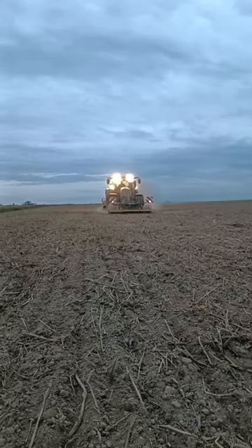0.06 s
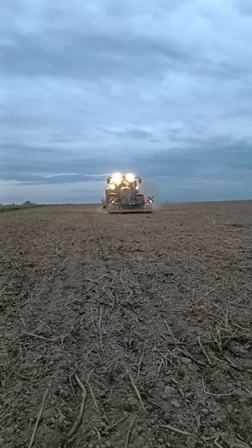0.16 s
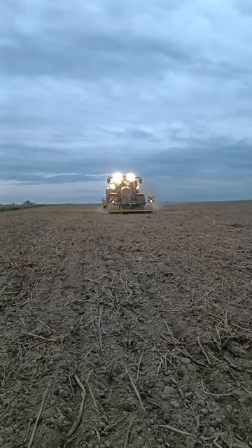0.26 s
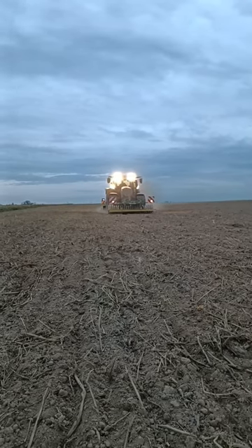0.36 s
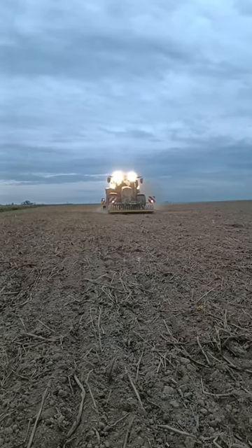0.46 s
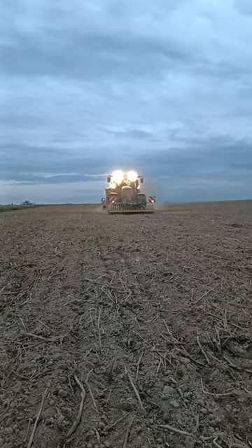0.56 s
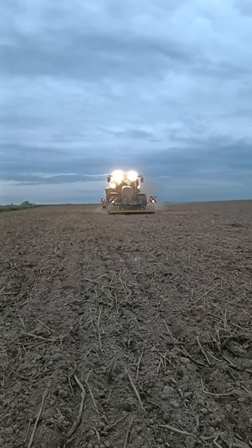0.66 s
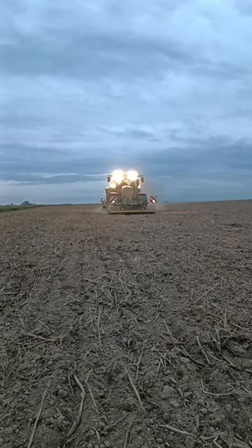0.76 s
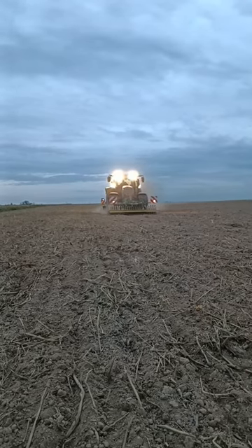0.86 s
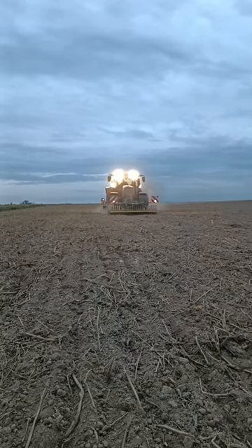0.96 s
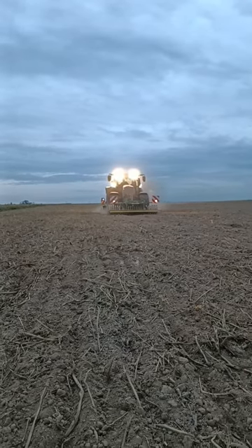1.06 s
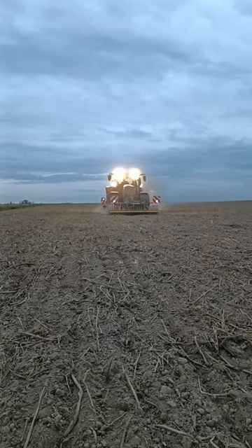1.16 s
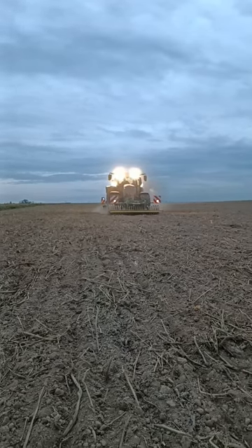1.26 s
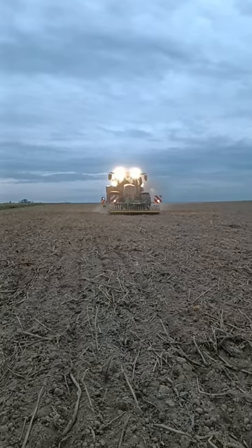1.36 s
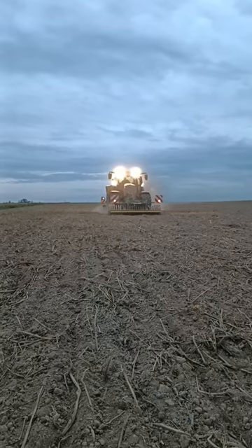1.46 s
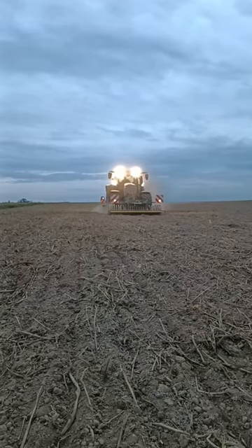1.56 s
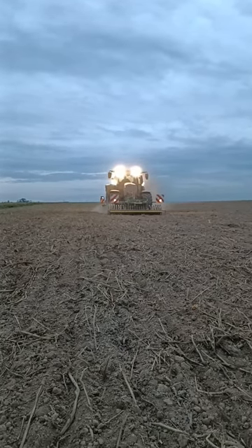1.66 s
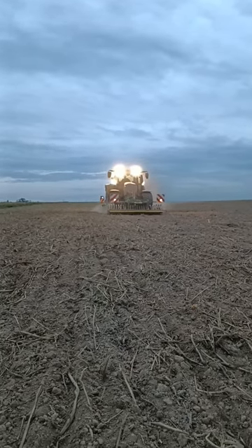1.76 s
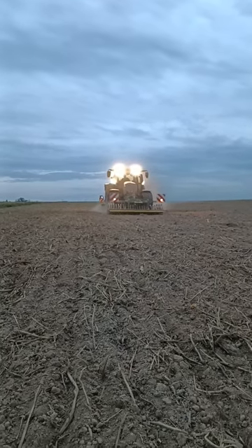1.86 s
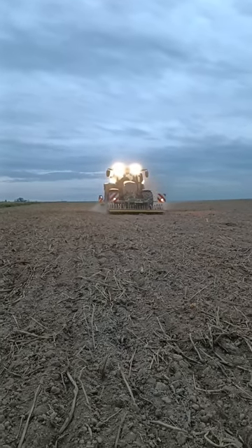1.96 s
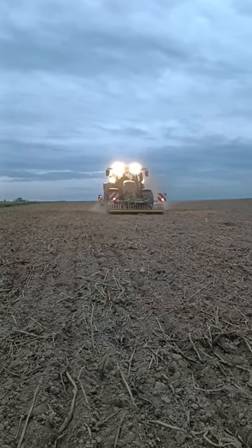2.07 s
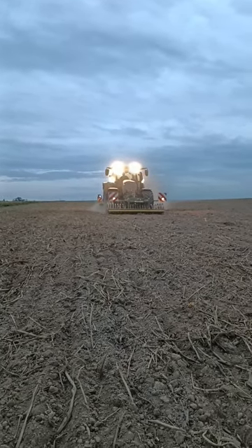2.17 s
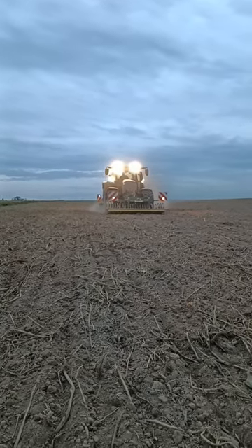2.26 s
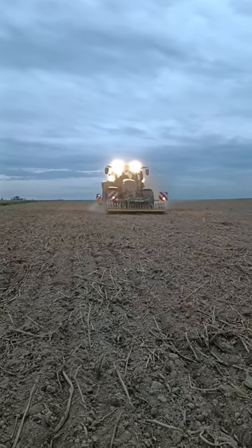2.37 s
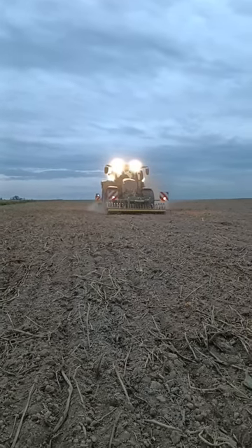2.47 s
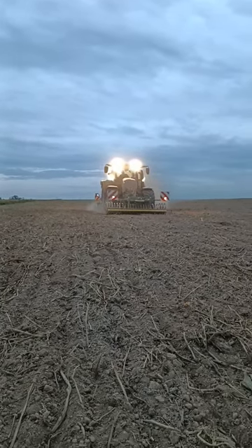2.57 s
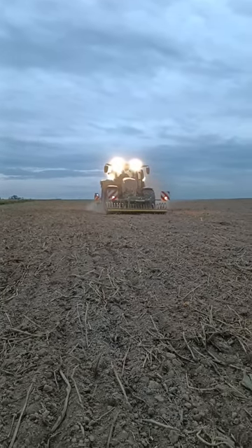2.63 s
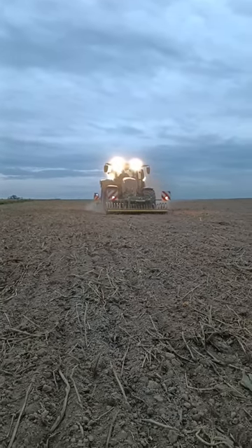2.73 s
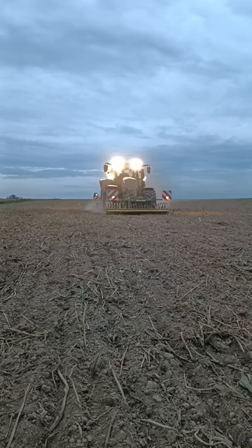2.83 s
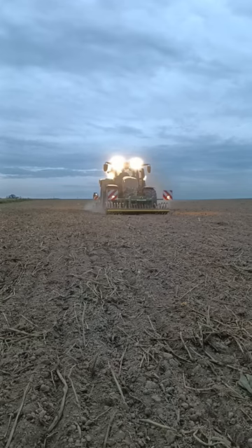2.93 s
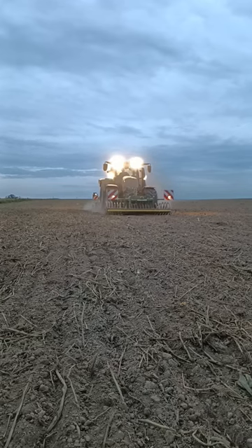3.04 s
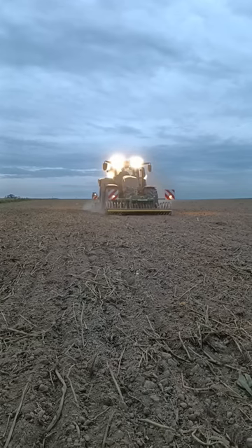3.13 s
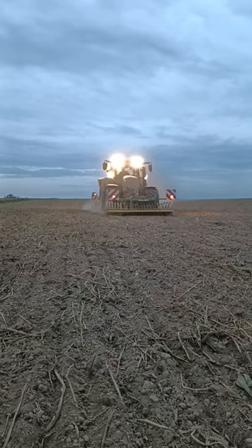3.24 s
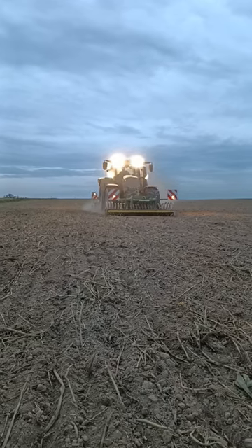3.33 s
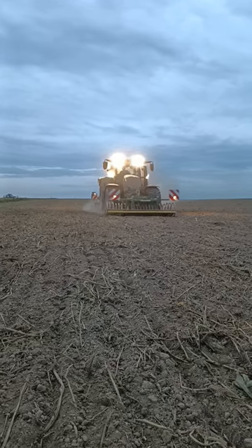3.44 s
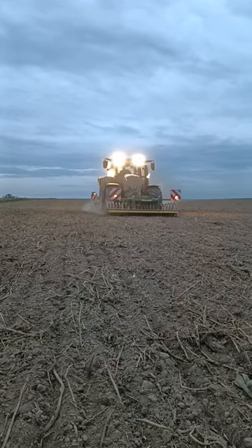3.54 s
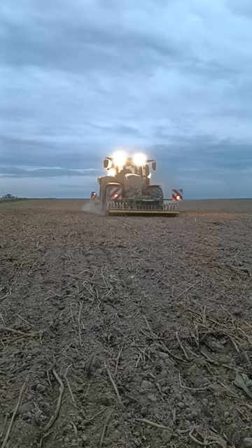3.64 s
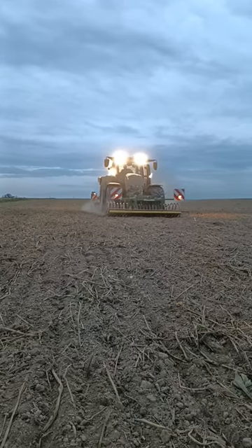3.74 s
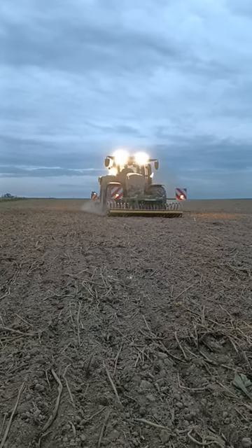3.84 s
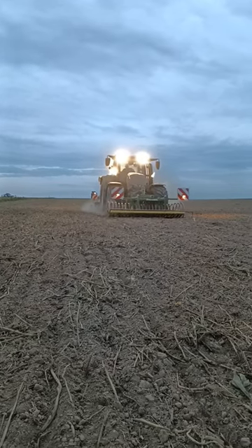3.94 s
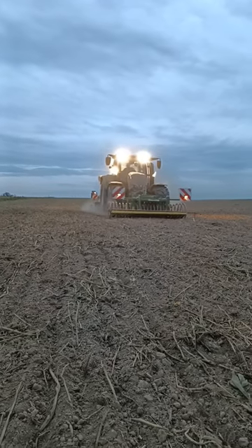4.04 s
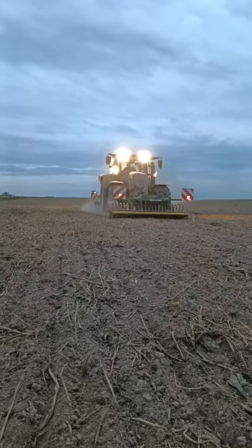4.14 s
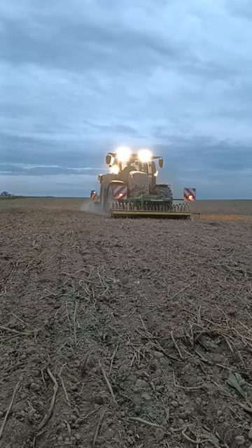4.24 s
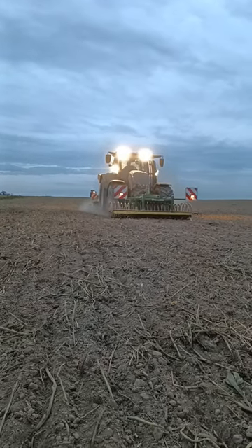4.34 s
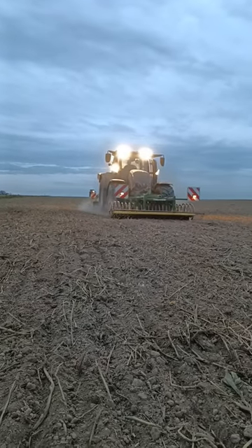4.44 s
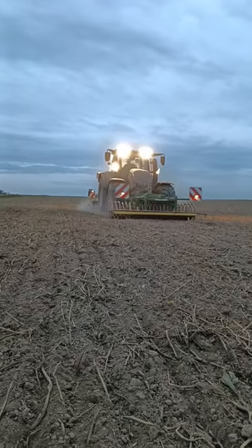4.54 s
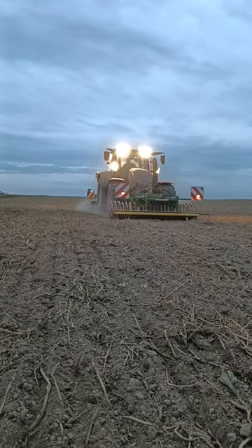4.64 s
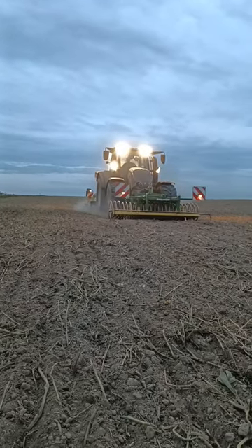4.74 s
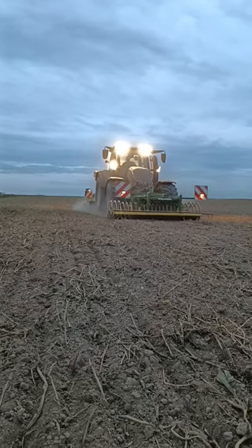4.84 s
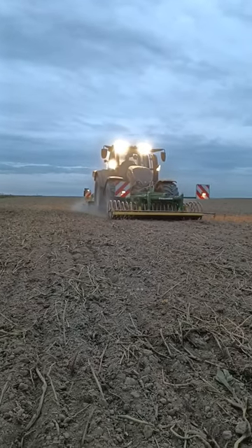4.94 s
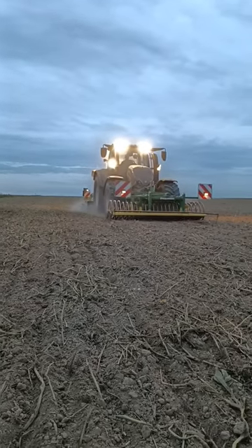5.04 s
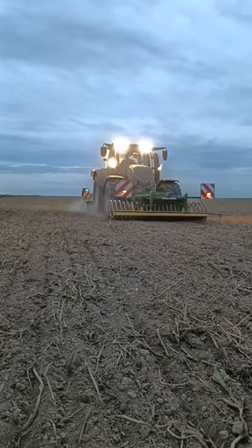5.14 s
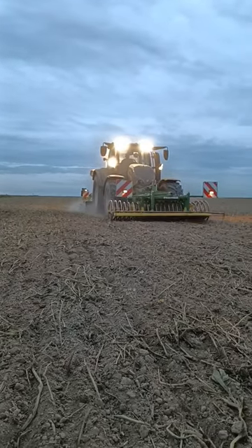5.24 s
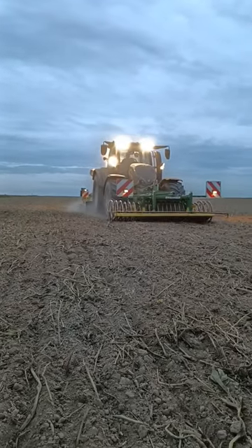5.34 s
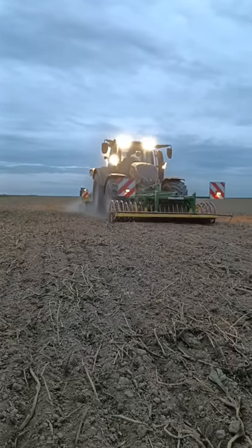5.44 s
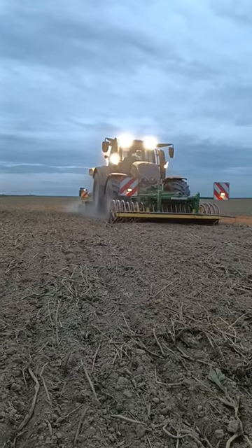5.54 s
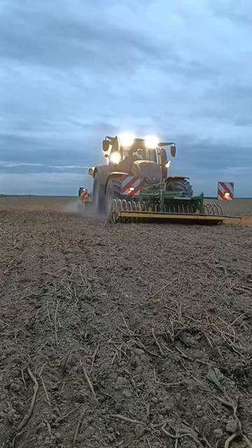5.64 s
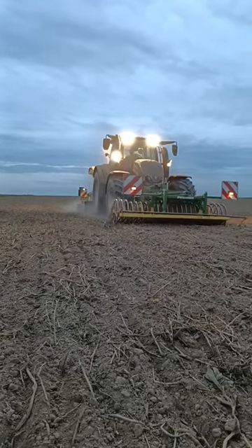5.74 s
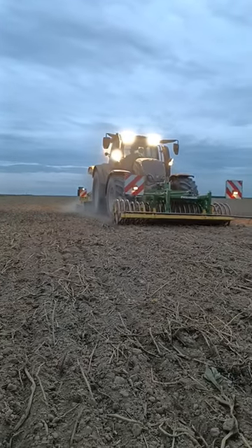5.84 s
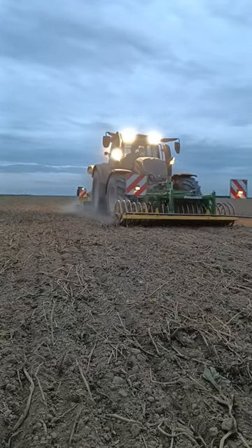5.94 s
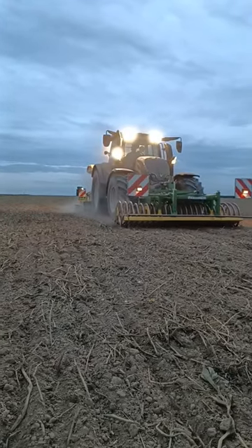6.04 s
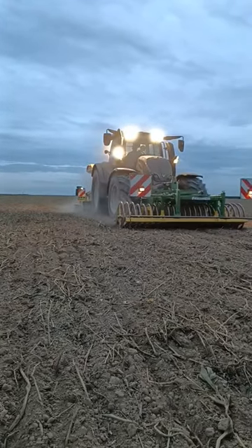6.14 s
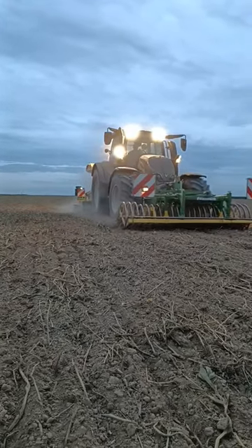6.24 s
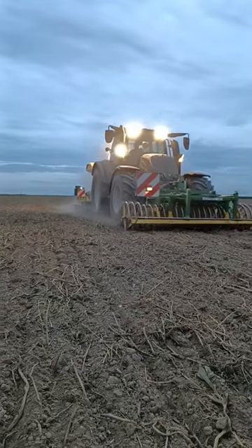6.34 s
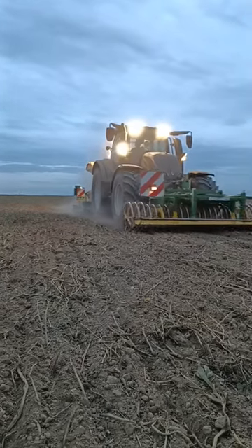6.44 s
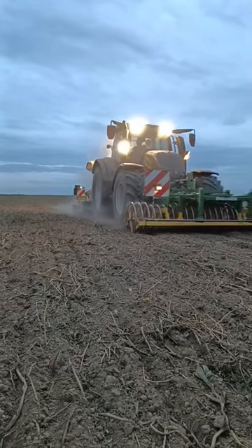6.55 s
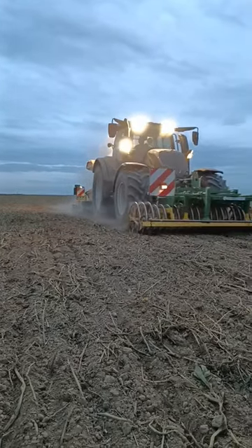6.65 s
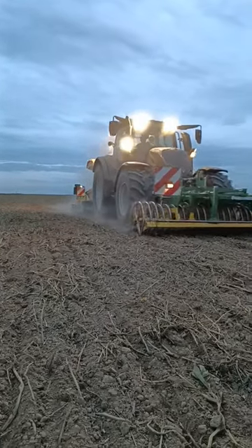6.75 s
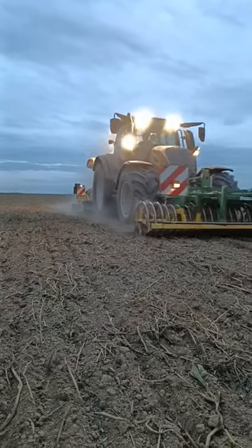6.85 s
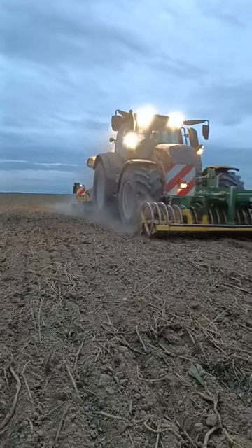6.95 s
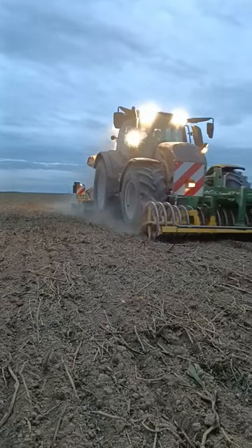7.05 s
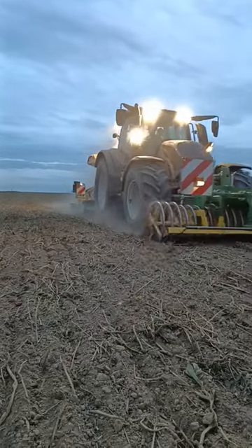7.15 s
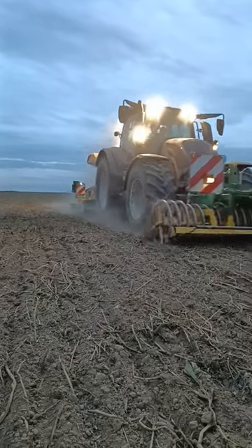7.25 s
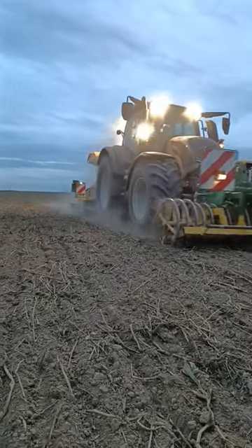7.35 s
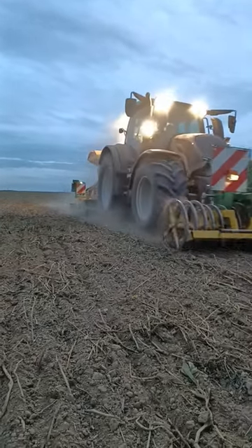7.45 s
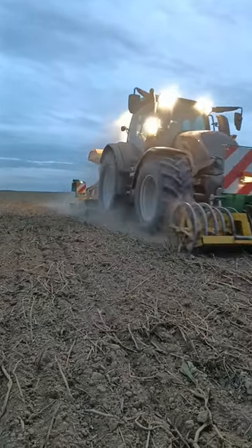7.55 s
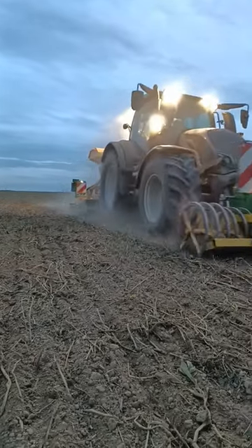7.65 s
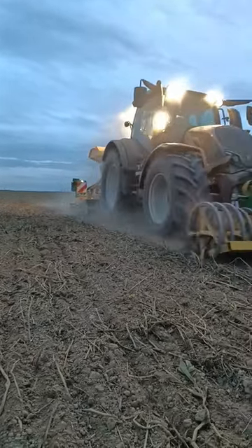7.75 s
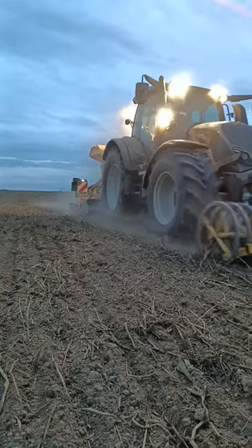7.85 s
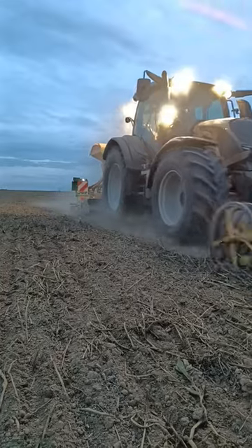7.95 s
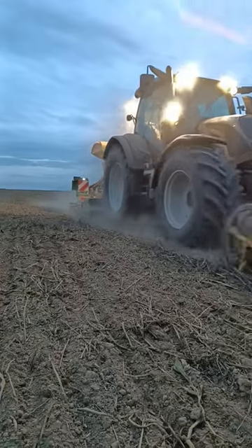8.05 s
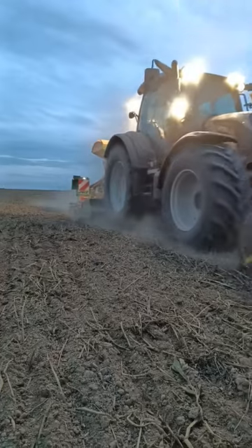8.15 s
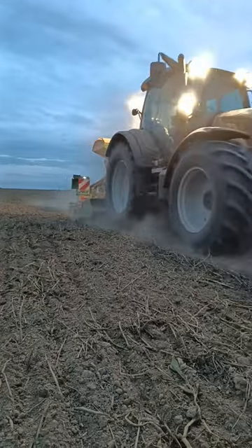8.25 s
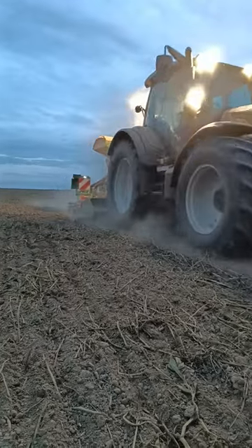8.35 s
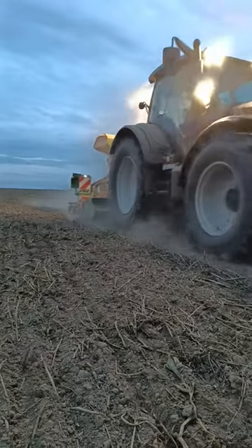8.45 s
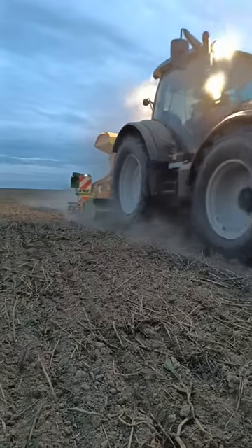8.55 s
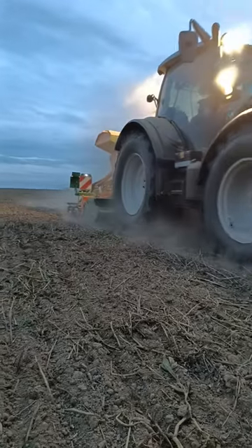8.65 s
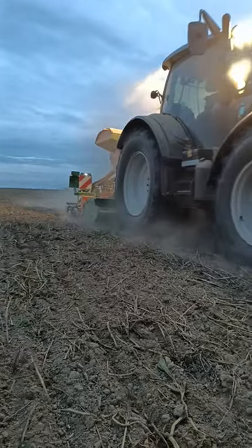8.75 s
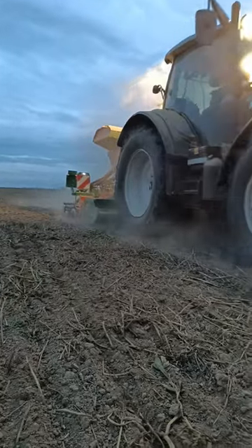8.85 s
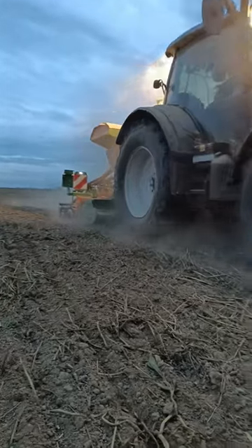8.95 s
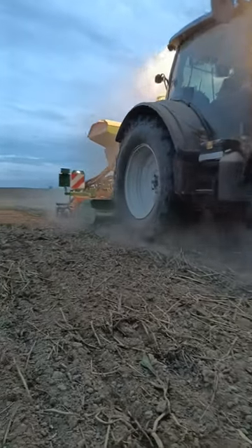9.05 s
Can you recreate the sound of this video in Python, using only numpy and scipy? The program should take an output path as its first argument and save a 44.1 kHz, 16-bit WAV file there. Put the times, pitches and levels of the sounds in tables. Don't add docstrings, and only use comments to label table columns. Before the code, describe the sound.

A diesel tractor approaches across an open field, its low throbbing roar swelling into close knocking, hiss, clinking steel rings and stone knocks.

```python
import sys
import numpy as np
from scipy import signal
from scipy.io import wavfile
from scipy.ndimage import uniform_filter1d

SR = 44100
rng = np.random.default_rng(int(sys.argv[2]) if len(sys.argv) > 2 else 0)


def output_pcm(signal):
    pcm = np.clip(np.atleast_2d(signal).T, -1, 1) * 32767
    wavfile.write(sys.argv[1], SR, np.round(pcm).astype(np.int16))


def gain_from_decibels(decibels):
    exponent = np.asarray(decibels, float) / 20
    return 10 ** exponent


N = 401310
FRAME, HOP = 2048, 512
FRAME_S = np.arange(N // HOP + 2) * HOP / SR
BIN_HZ = np.maximum(np.arange(FRAME // 2 + 1) * SR / FRAME, 1)


def in_time(rows, s=None):
    at, *columns = np.transpose(rows)
    times = np.arange(N) / SR if s is None else s
    return [np.interp(times, at, c) for c in columns]


def at_hz(rows, hz):
    at, *columns = np.transpose(rows)
    return [np.interp(np.log(hz), np.log(at), c) for c in columns]


def rms_one(x):
    return x / np.sqrt(np.mean(x ** 2) + 1e-20)


def drift(rate):
    r = np.exp(-80 * np.pi * rate / SR)
    slow = signal.lfilter([1], [1, -2 * r, r * r], rng.standard_normal(N // 40 + 2002))[2000:]
    return np.interp(np.arange(N) / 40, np.arange(len(slow)), rms_one(slow))


def ring(clicks, hz, t60):
    r, w = gain_from_decibels(-60 / (t60 * SR)), 2 * np.pi * hz / SR
    return signal.lfilter([0, np.sin(w)], [1, -2 * r * np.cos(w), r * r], clicks + 1e-18)


def spectrum(x):
    return signal.stft(x, nperseg=FRAME, noverlap=FRAME - HOP)[2]


def patch(s, length, hz, octaves):
    in_pitch = np.exp(-(np.log2(BIN_HZ / hz) / octaves) ** 2)
    return np.outer(in_pitch, np.exp(-((FRAME_S - s) / length) ** 2))


def approach(s):
    # time in seconds,
    # level in dB.
    effort = [(0, -4), (.15, -3), (.35, -1), (1.2, 0.5), (1.9, 0), (2.5, -0.8), (3.3, -1), (3.9, 0.5),
              (4.6, -0.8), (5.4, 0.1), (6.1, -0.2), (6.9, 0.5), (7.3, 0.5), (7.8, 0.5), (8.1, 0.3),
              (8.6, 0.5), (9.1, 1.3)]
    speed_m_per_s, abreast_s, side_m = 3.004, 9.187, 4.89
    far_m, near_m = 28, 6.27
    metres = np.hypot(side_m, speed_m_per_s * (abreast_s - s))
    spread_db = -20 * np.log10(metres / 10)
    effort_db, = in_time(effort, s)
    nearness = np.clip(np.log(far_m / metres) / np.log(far_m / near_m), 0, 1)
    ground_db = 19 * (metres / 25) ** 2.58
    air_db = np.minimum(1.1 * metres, 25)
    roar_db = -28 + 0.98 * spread_db + effort_db
    mids_db = -35 + spread_db - ground_db + 0.85 * effort_db
    hiss_db = -32 + 0.88 * spread_db + 0.27 * effort_db
    top_db = -40.5 + spread_db - air_db + 0.5 * effort_db
    return nearness, roar_db, mids_db, hiss_db, top_db


def tone_db(layer_db, nearness, far_near_db, swells):
    t, swell_s = np.arange(N) / SR, 0.19
    swell_db = sum(db * np.exp(-((t - s) / swell_s) ** 2) for s, db in swells)
    far_db, near_db = far_near_db
    return layer_db + far_db + (near_db - far_db) * nearness + swell_db


def colour(far, near, level_db, patchy_db):
    nearness = approach(FRAME_S)[0]
    far_db = np.outer(at_hz(far, BIN_HZ)[0], 1 - nearness)
    near_db = np.outer(at_hz(near, BIN_HZ)[0], nearness)
    gain = gain_from_decibels(far_db + near_db)
    gain = gain / np.sqrt(np.mean(gain ** 2, axis=0)) * gain_from_decibels(level_db)
    patches = uniform_filter1d(rng.standard_normal(gain.shape), size=5, axis=0)
    patches = uniform_filter1d(patches, size=7)
    return gain * gain_from_decibels(patchy_db * rms_one(patches))


def engine_cycles():
    # time in seconds, engine cycles per second.
    revs = [(0, 15.0), (.6, 15.05), (1.2, 15.3), (1.9, 15.2), (2.5, 14.87), (3.0, 14.95), (3.6, 15.17),
            (4.2, 15.17), (4.9, 15.05), (5.5, 14.98), (6.2, 15.03), (6.8, 15.15), (7.3, 15.08),
            (7.8, 14.87), (8.3, 14.98), (8.7, 15.12), (9.1, 15.0)]
    return np.cumsum(in_time(revs)[0]) / SR


def exhaust(cycles, nearness, roar_db):
    # multiple of the engine cycle, far level in dB, near level in dB.
    order_levels = [(3, -56, -41), (4, -33, -23), (5, -39, -27), (6, -31, -27), (7, -19, -19), (8, -13, -9),
                    (9, -19, -17), (10, -15, -20), (11, -20, -18), (12, -5, -7), (13, -10, -7),
                    (14, -19, -19), (15, -24, -17), (16, -16, -17), (17, -31, -24), (18, -27, -24),
                    (19, -32, -31), (20, -36, -24), (21, -41, -35), (22, -46, -36), (23, -49, -34),
                    (24, -48, -32), (25, -49, -36), (26, -47, -30), (27, -45, -30), (28, -47, -27)]
    # time in seconds, swell in dB.
    fourth_swells = [(4.25, 11), (4.65, 6), (5.1, 4), (5.6, 7.5), (6.0, 5), (6.4, 5), (6.9, 4.5), (7.3, 3),
                     (7.85, 3)]
    eighth_swells = [(.1, 7), (1.06, 2), (1.87, 6.5), (2.48, 7), (3.14, 11), (3.5, 3.5), (5.2, 5.5),
                     (6.07, 7), (6.69, 1.5), (7.43, 1), (8.29, -1), (8.92, 8.5)]
    twelfth_swells = [(1.24, 4.2), (1.95, 1.3), (2.79, 4.4), (3.0, 2.1), (4.3, 2), (4.7, 4.7), (5.0, 3.3),
                      (5.3, 5.4), (6.03, 5.4), (6.79, 4.5), (7.43, 7.3), (7.83, 3.6), (8.3, 1), (8.69, 7.5)]
    thirteenth_swells = [(.5, 4), (2.1, 2.2), (3.1, 6.2), (3.95, 2.3), (4.35, 2.4), (4.8, 8.4), (5.7, 3.9),
                         (6.75, 3.6), (7.15, 6.1), (7.5, 4.5), (7.85, 7), (8.2, 4.3), (8.85, 2.4)]
    swelling = {4: ((-34, -23.5), fourth_swells), 8: ((-17, -11), eighth_swells),
                12: ((-6, -11), twelfth_swells), 13: ((-13, -13), thirteenth_swells)}
    out = np.zeros(N)
    for k, far_db, near_db in order_levels:
        if k in swelling:
            level_db = tone_db(roar_db, nearness, *swelling[k])
        else:
            level_db = roar_db - 3 + far_db + (near_db - far_db) * nearness + 3.5 * drift(2.2)
        turns = k * cycles + rng.random()
        out += gain_from_decibels(level_db) * np.sin(2 * np.pi * turns + .5 * drift(2.5))
    return np.sqrt(2) * out


def engine_roar(noise, burst, roar_db, mids_db):
    # frequency in Hz, level in dB per Hz.
    roar_far, roar_near = [(15, -70), (33, -57), (60, -25), (109, -4), (178, 1), (209, -2), (276, -10),
                           (320, -52), (420, -68), (700, -120)], [(15, -51), (25, -56), (65, -19), (108, -8), (150, -0.5),
                                             (184, -16), (207, -6), (320, -21), (420, -58), (700, -120)]
    mids_far, mids_near = [(180, -14), (310, 10), (436, 2), (493, 5.5), (589, -8.5), (654, -3.5),
                           (694, 5.5), (770, -7.5), (893, -18), (1010, -2.5), (1310, -8), (2220, -120)], [(180, -19), (310, -6.5), (360, -9.5), (399, -2), (486, -6.5),
                                             (625, 1.5), (829, -6), (1010, -5.5), (1310, -14), (2220, -120)]
    faintest_mids_db = -73
    roar = colour(roar_far, roar_near, roar_db - 6.5, patchy_db=1.8)
    mids = colour(mids_far, mids_near, np.maximum(mids_db - 0.4, faintest_mids_db), patchy_db=1.0)
    broadside = gain_from_decibels(4 * patch(8.5, 0.61, 590, 0.37))
    heaves = gain_from_decibels(2.5 * drift(7)) * (2.2 + 0.11 * burst)
    return spectrum(noise * rms_one(heaves)) * np.hypot(roar, mids) * broadside


def fan_hiss(noise, burst, hiss_db, top_db):
    # frequency in Hz, level in dB per Hz.
    hiss_far, hiss_near = [(610, -28.5), (1030, -10), (1240, 1.5), (1290, -7), (1360, -3.5), (1470, -4),
                           (2660, -6), (2800, -9.5), (3370, -12.5), (4610, -11.5), (4910, -13),
                           (6310, -6.5), (8190, -25.5), (8800, -80), (11400, -49), (19400, -120)], [(610, -74), (1030, -12), (1230, -6), (1370, -10), (1750, -9),
                                             (2070, -12.5), (2640, -13), (2760, -13), (4290, -16.5),
                                             (5570, -15), (6430, -10), (6840, -12), (8800, -34.5),
                                             (11400, -66), (19400, -120)]
    top_far, top_near = [(5180, -70), (8800, -9), (9940, -15), (10800, -14), (11800, -16), (12600, -11),
                         (13400, -15), (13700, -34), (14050, -34), (14400, -11), (15300, -6), (15650, -30)], [(5180, -47), (8800, -2.5), (9320, -4), (10100, -7),
                                          (10500, -14.5), (11200, -2.5), (12100, -10), (12600, 1.5),
                                          (13600, -8), (14900, 4.5), (15600, -5.5)]
    hiss = colour(hiss_far, hiss_near, hiss_db + 0.1, patchy_db=1.0)
    top = colour(top_far, top_near, top_db - 1, patchy_db=3.5)
    rattle = gain_from_decibels(.55 * drift(16))
    throb = rattle * (.55 + .45 * burst)
    low = (BIN_HZ < 2900)[:, None]
    return np.hypot(hiss, top) * np.where(low, spectrum(noise * throb), spectrum(noise * rattle))


def band_gain():
    # time in seconds, how long in seconds, frequency in Hz, width in octaves, change in dB.
    passing_bands = [(8.6, 0.33, 1660, .08, 2), (8.8, 0.59, 1360, .1, -7.5), (8.07, 0.52, 1250, 0.066, 4.5),
                     (5.7, .3, 1300, .05, 3), (8.95, 0.18, 1200, .05, -0.5), (8.05, 0.26, 2100, .2, 3.5),
                     (2.8, .4, 1280, 0.16, 3), (8, .6, 14800, .06, 5), (6.6, 1.1, 13900, 0.022, -25),
                     (8.9, 0.25, 12700, .02, -23), (7.1, .3, 10300, 0.042, -7), (8.8, 0.25, 520, 0.21, 1.5),
                     (9.5, 0.18, 570, .3, -0.5), (5.4, 0.26, 294, 0.36, 5), (8.3, 0.17, 154, .3, 4),
                     (7.1, 0.22, 280, .3, 2), (1.6, 0.39, 78, .6, -9), (4.5, .15, 70, .6, 7),
                     (3.6, .15, 60, .6, -5), (6.9, .15, 5700, 0.41, 2)]
    return gain_from_decibels(sum(db * patch(s, lasts, hz, octaves) for s, lasts, hz, octaves, db in passing_bands))


def diesel_knock(cycles, nearness, mids_db, hiss_db):
    block_hz = [1093, 1170, 1245, 1389, 1650, 2140, 2590, 395, 646, 785]
    # far level in dB, near level in dB, time to fall 60 dB in seconds.
    block_levels = [(0, -8, 0.06), (-9.5, -12, 0.02), (-5, 1, 0.045), (4, -9, 0.05), (-9, -4, 0.04),
                    (-2.5, -3, 0.035), (-1, 1, 0.045), (5, -6, 0.055), (-12, -14, 0.06), (13, -9, 0.029)]
    cylinder_db = [3.5, 1.5, 0, -3]
    # time in seconds, swell in dB.
    whine_swells = [(1.7, 7), (2.3, 5.7), (3.2, 4.6), (3.6, 5), (4.05, 7.1), (6.13, 2.2), (6.74, 9),
                    (6.98, 4), (7.2, 4.8), (7.43, 10.3), (7.75, 4.9), (7.95, 1.4), (8.13, 9.1), (9.1, 2.7)]
    crank = cycles / cycles[-1] * (N - 1)
    firing = np.linspace(0, cycles[-1], N) * len(cylinder_db)
    strength = gain_from_decibels(np.array(cylinder_db)[firing.astype(int) % len(cylinder_db)])
    burst = rms_one(uniform_filter1d(strength * np.exp(-.55 * (firing % 1)), size=160))
    shake, out = burst * rng.standard_normal(N), np.zeros(N)
    for hz, (far_db, near_db, t60) in zip(block_hz, block_levels):
        if hz == block_hz[0]:
            level_db = tone_db(hiss_db, nearness, (-14.5, -16), whine_swells)
        else:
            layer_db = hiss_db if hz > 1000 else mids_db
            level_db = layer_db + far_db + (near_db - far_db) * nearness - 14.5 + 0.17 * drift(0.35)
        rung = ring(ring(shake, hz, t60), hz, t60)
        out += rms_one(np.interp(crank, np.arange(N), rung)) * gain_from_decibels(level_db)
    return out, np.interp(crank, np.arange(N), burst)


def turbo(top_db):
    # time in seconds, pitch in Hz.
    whistle = [(0, 12900), (1.8, 12760), (2.4, 12700), (3, 12350), (4.2, 13000), (5, 12550), (6, 13700),
               (7, 13100), (8, 13600), (9.1, 14100)]
    hz, = in_time(whistle)
    breath = gain_from_decibels(top_db - 18.0 + 2.9 * drift(60))
    return breath * np.sin(2 * np.pi * np.cumsum(hz + 110 * drift(90)) / SR)


def bearing_squeaks():
    # start in seconds, length in seconds, pitch in Hz, level in dB.
    squeak_table = [
        (1.51, .14, 4500, -45),
        (7.57, .06, 5750, -30),
        (7.5, .04, 5800, -32),
        (7.50, .05, 7250, -38),
        (7.30, .04, 4050, -32),
        (7.505, .04, 4080, -32),
        (7.45, .12, 5500, -37),
        (7.4, .3, 4600, -39),
    ]
    t, out = np.arange(N) / SR, np.zeros(N)
    for s, length, hz, level_db in squeak_table:
        swell = np.sin(np.pi * np.clip((t - s) / length + .1, 0, 1.2) / 1.2) ** 2
        out += gain_from_decibels(level_db) * swell * np.sin(2 * np.pi * np.cumsum(hz + 45 * drift(42)) / SR)
    return out


def wind():
    # start in seconds, peak in dB.
    puff_table = [
        (2.23, -33),
        (2.76, -30),
        (3.03, -32),
        (3.63, -43),
        (3.81, -43),
        (4.15, -40),
        (4.45, -42),
        (4.75, -40),
        (5.35, -38),
    ]
    t = np.arange(N) / SR
    lumps = sum(gain_from_decibels(peak_db - 20) * np.exp(-((t - s - .05) / 0.045) ** 2) for s, peak_db in puff_table)
    band = signal.butter(2, [35, 95], "band", fs=SR, output="sos")
    return lumps * rms_one(signal.sosfilt(band, rng.standard_normal(N)))


def clinks():
    # time in seconds, peak in dB, loudest pitch in Hz, left over right in dB.
    touch_table = [(2.2752, -54, 15300, 0), (2.5596, -55, 9500, 0), (2.832, -46, 11500, -3),
                   (2.855, -50, 15100, 0), (2.975, -54, 9700, 0), (3.205, -62, 15200, 0),
                   (3.434, -49, 15100, -16), (3.575, -54, 9720, 0), (3.8063, -37, 11500, -10),
                   (4.0237, -47, 15100, -2), (4.2073, -49, 15300, 0), (4.4802, -52, 15200, 0),
                   (5.0329, -54, 15100, 0), (4.293, -28.5, 15000, -4), (4.834, -38, 15300, -5),
                   (5.1452, -46, 15400, -2.0), (5.349, -32, 14900, -12), (5.567, -30, 10600, 6),
                   (5.7359, -38, 15300, 5), (6.04, -31, 15200, 2), (6.22, -32, 15000, -2),
                   (6.279, -24.5, 15200, -10), (6.371, -36, 14600, -12), (6.405, -34.5, 14900, -11),
                   (6.499, -19.5, 14500, -2), (6.6114, -36, 14900, -3), (6.8182, -18, 14850, -10),
                   (6.86, -27, 9720, 4), (6.865, -33, 11530, 2), (6.98, -33, 9720, 0),
                   (6.825, -32, 10800, 0), (6.972, -26, 11500, 9), (7.011, -37, 15000, -21),
                   (7.0827, -28, 14400, -6), (7.1761, -31, 14400, -8), (7.288, -29, 14900, -2),
                   (7.449, -29.5, 11600, 9), (7.645, -34, 14600, -3), (7.754, -24, 14000, -3),
                   (7.886, -25, 14300, -2), (8.283, -22.5, 14185, -14), (8.6846, -38, 14800, 0),
                   (8.845, -19, 11090, 0), (8.836, -18, 15000, -1), (8.9246, -24.5, 15000, 0.0),
                   (8.98, -25.5, 15000, 4)]
    steel_hz = [9720, 10400, 10800, 11090, 11530, 12500, 13680, 14185, 14450, 14710, 14990, 15130, 15315]
    # level in dB, time to fall 60 dB in seconds.
    steel_levels = [(-24, .09), (-18, .05), (-14, .05), (-18, .05), (-21, .08), (-20, .05), (-19, .08),
                    (-14, .09), (-10, .04), (0.1, .07), (-1.1, .06), (-7, .05), (-9, .05)]
    own_pitch_hz = 350
    s, peak_db, loudest_hz, pan_db = np.transpose(touch_table)
    chance = np.tanh(rng.standard_normal((len(s), len(steel_levels), 3)))
    out, fade = np.zeros((2, N)), np.exp(-1 / (.0012 * SR))
    for k, (hz, (level_db, t60)) in enumerate(zip(steel_hz, steel_levels)):
        touches = np.zeros((2, N))
        off_hz = hz - loudest_hz
        off_pitch_db = -20 * (1 - np.exp(-(off_hz / own_pitch_hz) ** 2))
        db = peak_db + 0.27 * level_db + off_pitch_db - 23.5
        uneven_db = 6 * chance[:, k, 0] * (np.abs(off_hz) > own_pitch_hz)
        for j, (late_s, bounce_db) in enumerate([(-.004, 3.5), (.005, 6), (.018, 3)]):
            at = ((s + late_s) * SR).astype(int)
            hit_db = db + bounce_db + 3 * chance[:, k, j] + uneven_db
            touches[:, at] = gain_from_decibels(hit_db + np.outer([.5, -.5], pan_db))
        chatter = signal.lfilter([1], [1, -fade], touches + 1e-18) * rng.standard_normal(N)
        chatter[1] *= -1 if k % 3 == 2 else 1
        out += ring(chatter, hz, t60) + .2 * chatter
    return signal.sosfilt(signal.butter(4, 9000, "high", fs=SR, output="sos"), out)


def stone_knocks():
    # time in seconds, peak in dB, pitch in Hz.
    knock_table = [(2.5556, -25, 8300), (2.955, -25, 8300), (2.99, -27, 8500), (3.0284, -30, 2560),
                   (3.7524, -30, 6300), (5.2674, -27, 6190), (5.3966, -26, 5900), (5.668, -15, 2680),
                   (6.5934, -23, 6080), (6.7027, -21, 6370), (7.3108, -20, 2730), (7.5394, -21, 6320),
                   (7.7892, -21, 2590), (8.1914, -21, 2550), (8.6234, -19, 6600)]
    tail, out = np.arange(SR // 8) / SR, np.zeros(N)
    for s, peak_db, hz in knock_table:
        crack = rng.standard_normal(len(tail)) * np.exp(-tail / .008)
        band = signal.butter(4, [1200, min(2.8 * hz, 10000)], "band", fs=SR, output="sos")
        dull = signal.sosfilt(band, crack)
        hit = .06 * ring(dull, hz, .03) + .06 * ring(dull, hz * 1.04, .025) + .7 * dull
        out[int(s * SR):][:len(tail)] += gain_from_decibels(peak_db - 9) * hit
    return out


def clod_thuds():
    # time in seconds, peak in dB.
    clod_table = [
        (3.429, -26.5),
        (5.0142, -11.5),
    ]
    tail, out = np.arange(SR // 8) / SR, np.zeros(N)
    pulse = np.sin(2 * np.pi * 420 * tail + 1.3) * np.exp(-tail / .0009)
    thud = signal.sosfilt(signal.butter(2, [60, 2000], "band", fs=SR, output="sos"), pulse)
    for s, peak_db in clod_table:
        out[int(s * SR):][:len(tail)] += gain_from_decibels(peak_db - 4) * thud
    return out


def at_pair(mid, side):
    # frequency in Hz, likeness far, likeness near, left over right in dB, extra left lead in radians.
    pair_rows = [(60, 1, 1, -.6, -.17), (200, 1, .99, -1.1, -.18),
                 (410, 1, 0.83, -4, -0.061), (616, 0.19, 0.88, 1, -0.99), (1000, 1, 0.99, -1, 0.62),
                  (1150, 0.79, 0.86, 4.5, -0.12), (1840, 0.9, 0.46, -5.5, -0.99), (2830, 1, 0.42, -4, 0.24),
                  (3600, 0.19, 0.042, -2, -1.15), (5600, 1, 0.18, -4, 0.16),
                  (6460, 0.28, 0.11, -5.5, -0.11), (7400, 1, 0.12, 3.5, -1.13),
                  (10600, 0.32, 0.25, -2.5, 0.99), (15000, .6, .6, -0.5, -0.31)]
    left_lead_s = 55e-6
    nearness = approach(FRAME_S)[0]
    far, near, balance_db, extra = at_hz(pair_rows, BIN_HZ)
    alike = np.clip(np.outer(far, 1 - nearness) + np.outer(near, nearness), 0, 1)
    mid, side = mid * np.sqrt(alike), side * np.sqrt(1 - alike)
    lead = np.exp(.5j * (2 * np.pi * BIN_HZ * left_lead_s + extra))
    tilt = (gain_from_decibels(balance_db / 2) * lead)[:, None]
    return np.array([(mid + side[0]) * tilt, (mid + side[1]) / tilt])


def wind_filter(both, hush):
    # time in seconds, length in seconds, pitch in Hz, dB on threshold.
    flutter_table = [(.12, .08, 990, -14), (.25, .05, 790, -8), (.75, .09, 980, -14), (.79, .05, 700, -22),
                     (1.02, .06, 450, -24), (1.17, .05, 780, -16), (1.3, .05, 950, -12),
                     (1.37, .1, 380, -14), (1.55, .05, 790, 8), (1.7, .04, 690, -10), (2.22, .06, 580, -16),
                     (2.17, .06, 390, -12), (1.97, .06, 640, -10), (2.6, .04, 600, -10), (3.1, .1, 600, 8),
                     (3.45, .08, 600, 8), (1.75, .08, 500, 10), (1.75, .15, 360, 18), (1.95, .1, 520, -14),
                     (2.09, .05, 370, 20), (2.12, .08, 650, 10), (2.35, .04, 540, 18), (2.5, .06, 470, 18),
                     (2.5, .08, 870, 10), (2.7, .05, 550, 12), (2.72, .04, 880, 10), (3.0, .04, 480, 14),
                     (3.25, .04, 850, 10), (3.78, .04, 800, 10), (5.45, .08, 850, 12)]
    threshold_db, most_cut_db, floor_db = -76, 15, -65.5
    top_hz, settle_s = 1030, 1.68
    power = uniform_filter1d(np.mean(np.abs(both) ** 2, axis=0), size=3, axis=0)
    power = uniform_filter1d(power, size=5)
    early_db = 9.5 * np.outer(BIN_HZ > 320, FRAME_S < settle_s)
    breeze_db = 2 * np.interp(FRAME_S * SR, np.arange(N), drift(4.5)) * (FRAME_S > settle_s)
    flutter_db = sum(db * patch(s, length, hz, .2) for s, length, hz, db in flutter_table)
    limit_db = threshold_db + early_db + flutter_db + np.outer(BIN_HZ > 320, breeze_db + 6.0)
    under_db = limit_db - 10 * np.log10(power + 1e-20)
    cut_db = np.clip(4 * under_db, 0, most_cut_db) * (BIN_HZ < top_hz)[:, None]
    floor_band = ((BIN_HZ > 300) & (BIN_HZ < top_hz))[:, None]
    return both * gain_from_decibels(-cut_db) + hush * gain_from_decibels(floor_db) * floor_band


def scene():
    cycles = engine_cycles()
    nearness, roar_db, mids_db, hiss_db, top_db = approach(np.arange(N) / SR)
    frame_roar_db, frame_mids_db, frame_hiss_db, frame_top_db = approach(FRAME_S)[1:]
    knock, burst = diesel_knock(cycles, nearness, mids_db, hiss_db)
    noise = rng.standard_normal((3, N))
    roar = engine_roar(noise, burst, frame_roar_db, frame_mids_db)
    hiss = fan_hiss(noise, burst, frame_hiss_db, frame_top_db)
    wide = (roar + hiss) * band_gain()
    engine = exhaust(cycles, nearness, roar_db) + knock + turbo(top_db)
    small_sounds = bearing_squeaks() + wind() + stone_knocks() + clod_thuds()
    direct = spectrum(engine + small_sounds)
    echo = direct * np.exp(-2j * np.pi * BIN_HZ * .004)[:, None]
    both = at_pair(wide[0] + direct, wide[1:] + [direct, echo])
    plain = spectrum(noise)[:, :, ::-1]
    filtered = wind_filter(both, 2.7 * plain[0] + 1.3 * plain[1:])
    field = signal.istft(filtered, nperseg=FRAME, noverlap=FRAME - HOP)[1][:, :N]
    return field + clinks()


def roll_off(x):
    return signal.sosfilt(signal.butter(12, 15570, fs=SR, output="sos"), x)


def record(dry):
    top_cut = signal.ellip(8, .5, 55, 15520, fs=SR, output="sos")
    mix = signal.sosfilt(top_cut, dry)
    return roll_off(mix)


dry = scene()
out = record(dry)
output_pcm(out)
```